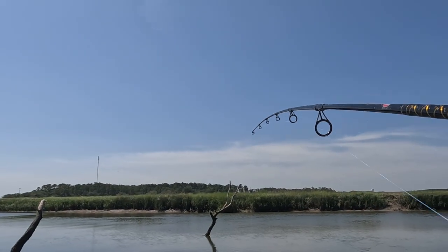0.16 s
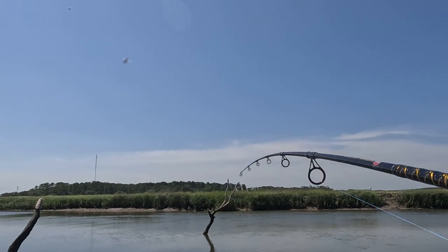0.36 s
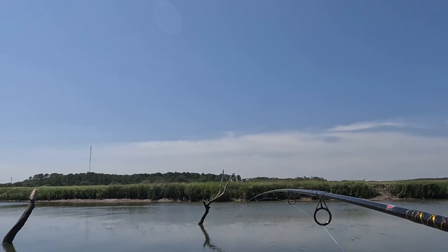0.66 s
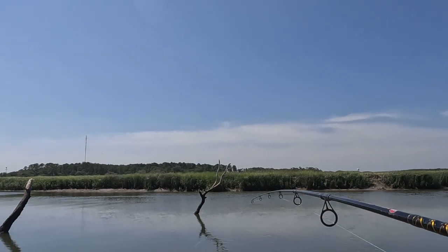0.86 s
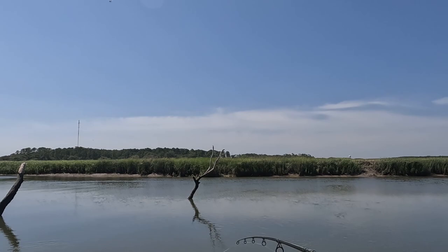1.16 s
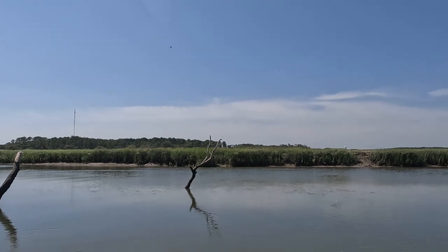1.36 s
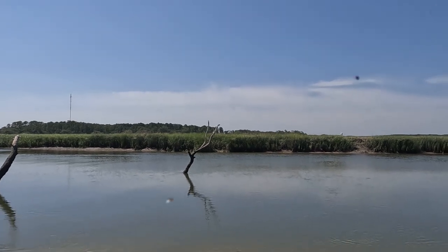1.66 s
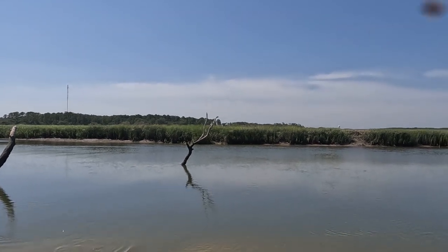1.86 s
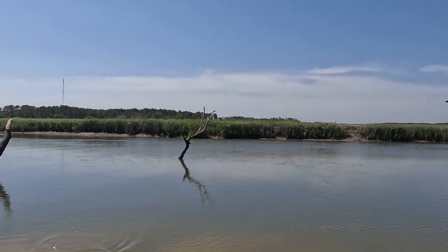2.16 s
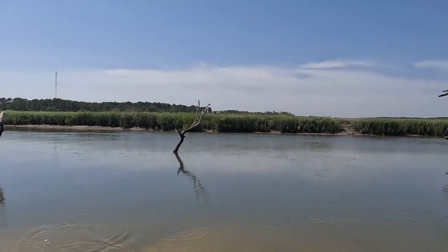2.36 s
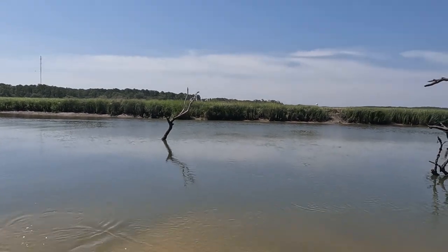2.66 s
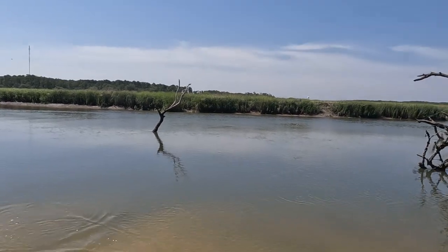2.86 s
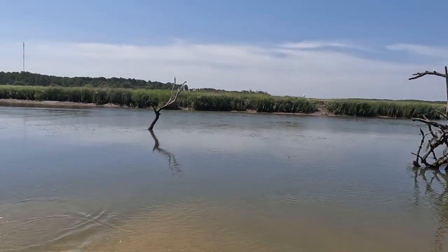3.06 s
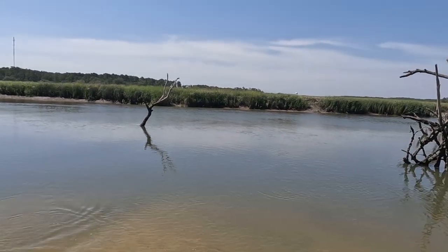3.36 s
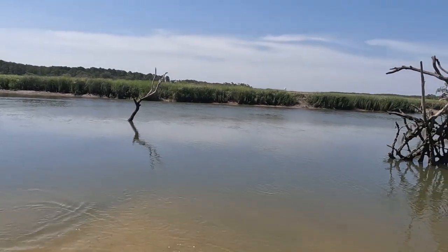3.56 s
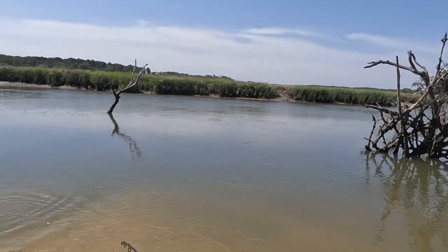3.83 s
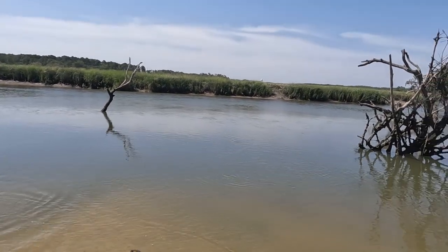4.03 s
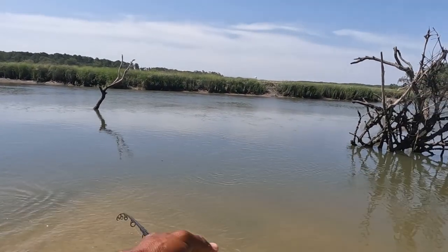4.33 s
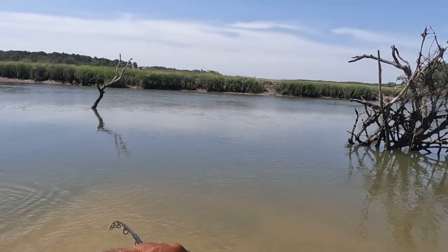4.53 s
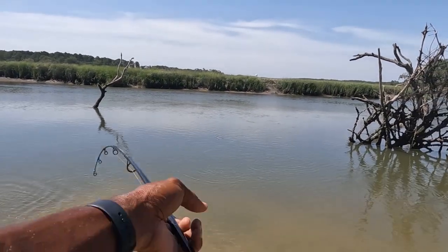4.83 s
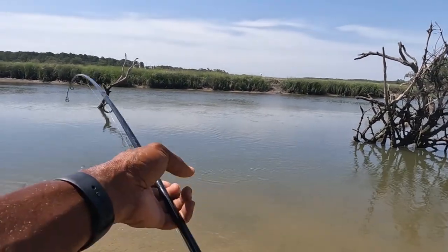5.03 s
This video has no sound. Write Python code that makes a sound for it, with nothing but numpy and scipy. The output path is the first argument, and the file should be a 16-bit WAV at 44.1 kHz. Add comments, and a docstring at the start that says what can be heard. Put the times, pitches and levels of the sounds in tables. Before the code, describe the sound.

A fishing reel is cranked in uneven whirring pushes with small clicks, then a fish thrashes and splashes in shallow water in light wind.

```python
"""A fishing reel cranked in uneven pushes: gear-mesh tones trace arches of pitch and contacts ring briefly.
Line hisses through the guides as grainy noise, with a rod rustle, a hoarse line note and grip scrapes.
In the shallows, swirling then thrashing, bubbles ring as decaying gliding tones, slaps as short modes,
and churn, splash and spray as clouds of droplet rings over noise. A low drone glides beneath.
Wind is low noise with gusts at two microphone ports, which differ in level and phase."""
import sys
import numpy as np
from scipy import signal
from scipy.fft import rfft, irfft, next_fast_len
from scipy.io import wavfile
from scipy.ndimage import uniform_filter1d

SR = 44100
rng = np.random.default_rng(int(sys.argv[2]) if len(sys.argv) > 2 else 0)


def master(y):
    """Save y as 16-bit WAV."""
    cut = np.clip(np.atleast_2d(y).T, -1, 1)
    pcm = np.round(cut * 32767)  # scale
    wavfile.write(sys.argv[1], SR, pcm.astype(np.int16))


N = 228967

# Spectrum of water noise and droplets. Each row: frequency in Hz, relative level in dB per Hz.
WATER_SPECTRUM = [(150, -31), (250, 35), (372, -7.5), (434, -7), (583, -7), (929, -6), (1010, -9),
                  (1330, -11), (1590, -12.5), (2060, -12.5), (2360, -21.5), (2660, -10.5), (3700, -19.5),
                  (6880, -20.5), (10000, -36.5), (12000, -33), (15500, -45)]


def from_db(db):
    """Amplitude ratio is ten to the power of decibels over twenty."""
    return 10 ** (np.asarray(db) / 20)


def rms_one(x):
    """Dividing by the root mean square normalizes a signal to unit power."""
    return x / np.sqrt(np.mean(x ** 2) + 1e-20)


def in_time(rows):
    """Linear interpolation reads each column of a time curve at every sample."""
    s, *columns = np.transpose(rows)
    return [np.interp(np.arange(N) / SR, s, c) for c in columns]


def during(rows, fade=0.17):
    """A trapezoidal gate is one while a curve lasts and fades linearly to zero outside it."""
    start, end = rows[0][0], rows[-1][0]
    return np.interp(np.arange(N) / SR, [start - fade, start, end, end + fade], [0, 1, 1, 0])


def at_hz(points, hz):
    """A spectrum is interpolated linearly over logarithmic frequency."""
    points = np.array(points)
    return np.interp(np.log(hz), np.log(points[:, 0]), points[:, 1])


def drift(rate):
    """Noise through a two-pole low-pass (bandwidth set by rate in Hz) wanders smoothly at unit rms."""
    r = np.exp(-40 * np.pi * rate / SR)  # computed at every 20th sample
    white = rng.standard_normal(N // 20 + 4002)
    slow = signal.lfilter([1], [1, -2 * r, r * r], white)[4000:]  # drop the filter's start-up
    return np.interp(np.arange(N) / 20, np.arange(len(slow)), rms_one(slow))


def band(x, low_hz, high_hz):
    """A Butterworth band-pass has a maximally flat passband."""
    edges = [low_hz, min(high_hz, SR / 2 - 1000)]
    return signal.sosfilt(signal.butter(2, edges, "band", fs=SR, output="sos"), x + 1e-18)


def resonate(x, hz, width_hz):
    """A damped pole pair forms one resonance, its pole radius set by bandwidth, with peak gain near 1."""
    r = np.exp(-np.pi * width_hz / SR)
    zeros = np.array([1, 0, -1]) * (1 - r * r) / 2
    return signal.lfilter(zeros, [1, -2 * r * np.cos(2 * np.pi * hz / SR), r * r], x + 1e-18)


def spread(mid, side, hz):
    """Mid and side sums of two signals set the interchannel coherence, lowest in the treble."""
    # Coherence of the two ports. Each row: frequency in Hz, likeness from 0 to 1.
    likeness = [(30, .9), (60, .85), (130, .99), (500, .97), (2000, .96), (4000, .92), (7500, .7),
                (13000, .4)]
    alike = np.clip(at_hz(likeness, hz), 0, .995)
    return np.sqrt(1 + alike) * mid + np.sqrt(1 - alike) * side * np.array([[1], [-1]])


def panned(x, left_db):
    """An interchannel level difference moves a source sideways."""
    return x * from_db(left_db * np.array([[.5], [-.5]]))


def add(out, s, sound):
    """Linear superposition mixes a short sound in at a time in seconds."""
    at = max(round(s * SR), 0)
    out[:, at:at + sound.shape[-1]] += sound[..., :max(N - at, 0)]


def noise(colour, low_hz, high_hz, patchy_db, count):
    """Subband synthesis: stereo noise bands flicker independently under a spectrum; total rms 1."""
    out, white = 0, rng.standard_normal((2, 2, N))
    edges = np.geomspace(low_hz, high_hz, count + 1)
    for k, (low, high) in enumerate(zip(edges, edges[1:])):
        hz = np.sqrt(low * high)
        gain = from_db(at_hz(colour, hz) + patchy_db * drift(25.5))
        out = out + gain * spread(*band(white[k % 2], low, high), hz)
    return rms_one(out)


def ringing_noise(x, hz, width_hz):
    """Two equal resonances in cascade sharpen a noise spectrum into a skirted peak; rms 1."""
    return rms_one(resonate(resonate(x, hz, width_hz), hz, width_hz))


def surges(rows, attack_s, release_s):
    """Envelopes rise, hold and decay exponentially, adding in power; one gain curve per level column."""
    power = 0
    for s, hold_s, *levels_db in rows:
        t = np.arange(N) / SR - s
        decay = np.exp(-np.clip((t - attack_s - hold_s) / release_s, 0, 20))
        shape = np.clip(t / attack_s, 0, 1) * decay
        power = power + np.outer(from_db(levels_db), shape) ** 2
    return np.sqrt(power)


def droplets(start_s, low_hz, high_hz, per_s, size_db, cycles, rise, count):
    """Small bubbles, as damped oscillators at random times, ring with rising pitch; rms 1 from start_s."""
    out, first = np.zeros((2, N)), int(start_s * SR)
    for hz in np.geomspace(low_hz, high_hz, count):
        drops = int(np.clip(per_s * (N - first) / SR / count, 1, 400))
        when, chance, pitch, side = rng.random((400, 4))[:drops].T
        size_level_db = size_db * np.minimum(-np.log(chance), 3)  # exponential spread, bounded
        size = from_db(size_level_db + at_hz(WATER_SPECTRUM, hz)) * hz
        step = np.arange(int(4 * cycles * SR / hz))
        turns = step * hz / SR
        detune = (high_hz / low_hz) ** ((pitch[:, None] - .5) / count)
        tones = np.sin(2 * np.pi * detune * turns * (1 + rise * turns / cycles))
        rings = tones * np.exp(-turns / cycles) * (1 - np.exp(-turns))
        at = (first + when * (N - first)).astype(int)[:, None] + step
        offset = size * np.sqrt(12) * (side - .5)  # uniform chance at unit variance
        for channel, gains in enumerate(spread(size, offset, hz)):
            out[channel] += np.bincount(at.ravel(), (gains[:, None] * rings).ravel(), N)[:N]
    return out / np.sqrt(np.mean(out[:, first:] ** 2))


def impacts(rows, ring_s, body_db, upper_db, upper_ratio, crack_db, crack_s, top_db, scatter_db, tail_s,
            attack_s):
    """Modal impact: two damped modes join a broad knock, a bright crack and a faint scattered tail."""
    out, t = np.zeros((2, N)), np.arange(SR // 16) / SR
    for s, peak_db, hz, treble_db in rows:
        decay = np.exp(-t / crack_s) + from_db(scatter_db) * np.exp(-t / tail_s)
        grit = rng.standard_normal((4, len(t))) * decay
        ring = np.sin(2 * np.pi * hz * t) * np.exp(-t / ring_s)
        upper_hz = min(upper_ratio * hz, 7500)
        upper = from_db(upper_db) * np.sin(2 * np.pi * upper_hz * t) * np.exp(-2 * t / ring_s)
        knock = from_db(body_db) * spread(*band(grit[:2], hz * 0.76, hz * 1.28), hz)
        top = spread(*band(grit[:2], 10800, 13000), 11000)
        crack = spread(*band(grit[2:], 3100, 6840), 4600) + from_db(top_db) * top
        hit = ring - upper + knock + from_db(crack_db + treble_db) * crack
        hit = hit * (1 - np.exp(-t / attack_s))
        # nominal peak: twice the rms of the loudest 2 ms
        crest = 2 * np.sqrt(uniform_filter1d(hit[0] ** 2 + hit[1] ** 2, SR // 500).max() / 2)
        add(out, s, from_db(peak_db) * hit / crest)
    return out


def arches(rows, swell):
    """Rotation that quickens and slows traces parabolic arches of pitch in Hz and strength."""
    slow_hz = 1045  # pitch at which an arch begins and dies away
    pitch, pushed = np.full(N, float(slow_hz)), np.zeros(N)
    for s, up_s, down_s, top_hz, whine_db in rows:
        t = np.arange(N) / SR - s
        effort = np.maximum(1 - (t / np.where(t < 0, up_s, down_s)) ** 2, 0)
        arch = slow_hz + (top_hz - slow_hz) * effort
        faster = arch > pitch  # the faster push takes over
        pushed[faster] = from_db(whine_db) * effort[faster] ** swell
        pitch[faster] = arch[faster]
    return uniform_filter1d([pitch, pushed], SR // 50)  # inertia rounds each change of speed


def whirr(pitch, rough, overtone_db):
    """Phase integrates a wavering pitch; modulation adds roughness and a throb per pinion turn."""
    teeth, throb_depth = 22, .32
    phase = 2 * np.pi * np.cumsum(pitch * (1 + .009 * drift(50))) / SR
    tone = (1 + rough * drift(70)) * np.sin(phase) + rough * drift(70) * np.cos(phase)
    tone = tone / np.sqrt(.5 + rough ** 2)
    throb = 1 + throb_depth * np.sin(phase / teeth + drift(30))
    throb = throb / np.sqrt(1 + throb_depth ** 2 / 2)
    return tone * throb * (1 + from_db(overtone_db) * 2 * np.cos(phase))  # product adds the octave


def air(level_db=-70.5):
    """Broadband noise of nearly steady band levels gives the faint hush of open air."""
    # Spectrum of the hush. Each row: frequency in Hz, relative level in dB per Hz.
    air_spectrum = [(180, -30), (300, -2), (562, -41), (849, -33), (1460, -2.5), (2210, -35), (7020, -15.5),
                    (9600, -33.5), (12100, -43), (15500, -101)]
    return from_db(level_db) * noise(air_spectrum, 356, 15900, patchy_db=1.0, count=9)


def wind(buffet_gain_db=-6.0, rumble_gain_db=1.5, rush_gain_db=1.5, lee_db=-3.0):
    """Turbulent pressure buffets the ports, the left in the lee, over low-frequency rumble and rush."""
    breeze_db = -30.5  # buffeting between gusts, ahead of its gain
    # Steadier wind. Each row: time in seconds, rumble and low rush in dB ahead of their gains.
    steady = [(0.0, -42, -51.5), (0.36, -51, -54), (1.14, -44.5, -49.5), (1.21, -48.5, -52.5),
              (1.76, -41.5, -49.5), (2.15, -55, -52.5), (3.18, -48.5, -53), (3.59, -48, -42.5),
              (3.8, -47.5, -49.5), (4.22, -53, -47.5), (4.35, -42.5, -53), (4.91, -54.5, -43),
              (5.19, -44, -44)]
    # Spectrum of wind noise. Each row: frequency in Hz, relative level in dB per Hz.
    wind_spectrum = [(8.8, -29), (15, 5.5), (26, -13), (59, -19.5), (102, -25), (174, -20.5), (402, -45.5),
                     (446, -53.5), (557, -78.5), (628, -37), (684, -46), (758, -43), (855, -46), (900, -43),
                     (1170, -73), (1980, -120)]
    # Gusts on the ports. Each row: start in seconds, hold in seconds, level in dB ahead of the gain.
    gust_rows = [(.17, 0.0094, -20.5), (.62, 0.13, -20.5), (.85, 0.065, -27.5), (1.36, 0.25, -26),
                 (1.51, 0.12, -20), (1.98, 0.017, -21), (2.2, 0.16, -20), (3.26, 0.099, -28),
                 (3.76, 0.044, -24), (4.29, 0.023, -19.5), (4.49, 0.022, -18.5), (5.04, 0.069, -19.5)]
    rumble_db, rush_db = in_time(steady)
    gusts, = surges(gust_rows, attack_s=0.0091, release_s=0.042)
    strength = from_db(buffet_gain_db) * np.hypot(from_db(breeze_db), gusts)
    buffet = strength * noise(wind_spectrum, 13.16, 49.3, patchy_db=2.0, count=4)
    low_pass = signal.butter(4, 40, fs=SR, output="sos")
    buffet = panned(signal.sosfilt(low_pass, buffet), lee_db)
    rumble = noise(wind_spectrum, 40.5, 119.3, patchy_db=1.5, count=3)
    rush = noise(wind_spectrum, 120.7, 415.7, patchy_db=2.0, count=8)
    return (buffet + from_db(rumble_db + rumble_gain_db) * rumble
            + from_db(rush_db + rush_gain_db) * rush)


def drone():
    """Integrating a gliding pitch gives a low tone; random quadrature modulation makes it waver."""
    # Hollow note as the fish turns. Each row: time in seconds, pitch in Hz, level in dB.
    drone_curve = [(3.2, 155.6, -51), (3.42, 160.4, -46), (3.5, 185.4, -48), (3.58, 173.2, -34),
                   (3.65, 176.3, -54), (3.72, 178.4, -39), (3.77, 134, -41.5), (3.81, 138.8, -58),
                   (3.86, 160.2, -37), (3.92, 186.2, -56), (4.04, 158.6, -44), (4.12, 170, -41.5),
                   (4.2, 177.6, -47.5), (4.35, 177, -62)]
    pitch, level_db = in_time(drone_curve)
    phase = 2 * np.pi * np.cumsum(pitch) / SR
    tone = (1 + .3 * drift(20)) * np.sin(phase) + .4 * drift(20) * np.cos(phase)
    return during(drone_curve) * from_db(level_db) * tone


def swirl(gain_db=0.5, small_db=-1.5):
    """Drops trickling around the turning fish ring as damped bubbles, the smaller ones higher."""
    # Drips flicked up. Each row: time in seconds, level in dB ahead of the gain.
    swirl_curve = [(3.12, -87), (3.22, -63), (3.33, -72), (3.45, -74.5), (3.68, -79), (3.82, -65),
                   (3.92, -63), (4.04, -70.5), (4.15, -72)]
    level_db, = in_time(swirl_curve)
    large = droplets(3, 1300, 4500, per_s=170, size_db=3.5, cycles=10, rise=.01, count=10)
    small = droplets(3, 4800, 8000, per_s=110, size_db=4.0, cycles=14, rise=.006, count=6)
    return during(swirl_curve) * from_db(level_db + gain_db) * (large + from_db(small_db) * small)


def bubbles(attack_s=0.0026, glide_lengths=0.99):
    """A closing air pocket oscillates at its own pitch, gliding up or down as it decays."""
    # Air pockets. Each row: start in seconds, starting pitch in Hz, nominal peak in dB,
    # length in seconds, glide in octaves per length (negative falls).
    pockets = [(0.191, 240, -30.5, 0.014, -0.1), (1.151, 605, -43, 0.038, 0.16),
               (2.602, 550, -46.5, 0.017, 0.05), (2.626, 602, -52.5, 0.022, 0.13),
               (3.221, 1480, -40.5, 0.0093, 0.11), (3.223, 600, -44.5, 0.032, 0.59),
               (3.245, 877, -42.5, 0.025, 0.6), (3.298, 310, -43.5, 0.094, 0.19),
               (3.304, 397, -38, 0.0095, -0.79), (3.309, 1022, -44, 0.028, 0.058),
               (3.362, 623, -53, 0.031, 0.84), (3.355, 161, -32, 0.024, -0.1),
               (3.445, 677, -49.5, 0.029, 1.56), (3.409, 495, -52, 0.032, -0.01),
               (3.47, 189, -36, 0.12, 0.26), (3.522, 486, -57, 0.054, 0.74),
               (3.503, 333, -51, 0.089, -0.24), (3.55, 182, -27.5, 0.026, -0.17),
               (3.613, 253.4, -40.5, 0.062, 0.14), (3.831, 1640, -47.5, 0.016, -0.055),
               (3.89, 862, -47.5, 0.043, 0.19), (3.998, 998, -52, 0.033, 0.25),
               (4.212, 737, -31, 0.0093, 0.55), (4.212, 1176, -36, 0.011, 0.096),
               (4.277, 664, -30, 0.012, -0.27), (4.343, 430, -34, 0.015, 0.59),
               (4.382, 520, -36, 0.011, 0.7), (4.562, 464, -23.5, 0.015, 0.28),
               (4.586, 708, -26.5, 0.024, -0.08), (4.614, 462, -40, 0.054, -0.2),
               (4.63, 910, -35.5, 0.043, 0.011), (4.653, 402, -25.5, 0.019, -0.19),
               (4.697, 340, -24, 0.01, 0.063), (4.721, 575, -35.5, 0.031, 1.6),
               (4.773, 780, -27, 0.011, 0.22), (4.844, 366, -35, 0.017, -0.31),
               (4.849, 261, -25.5, 0.03, 0.19), (4.873, 1310, -33, 0.0041, -0.28),
               (4.875, 322, -31.5, 0.042, 1.1), (4.922, 758, -35.5, 0.0466, 0.97),
               (5.117, 905, -46, 0.065, 0.12), (5.178, 912, -36.5, 0.075, 0.066)]
    out, t = np.zeros((2, N)), np.arange(SR // 4) / SR
    for s, hz, peak_db, length, rise in pockets:
        pitch = hz * 2 ** (rise * np.minimum(t / length, glide_lengths))
        phase = 2 * np.pi * np.cumsum(pitch) / SR
        wobble = 1 + .3 * rms_one(band(rng.standard_normal(len(t)), 15, 90))
        shape = (1 - np.exp(-t / attack_s)) * np.exp(-(t / length) ** 2 * 1.83)
        add(out, s, from_db(peak_db) * shape * wobble * np.sin(phase))
    return out


def patter(grain_db=6.5):
    """Random modulation of a narrow treble band gives the thin sizzle of fine spray landing close by."""
    # Spray falling. Each row: start in seconds, hold in seconds, level in dB ahead of the grain.
    patter_rows = [(3.2, 0.012, -88), (3.29, 0.0076, -62.5), (3.41, 0.0069, -70), (3.92, 0.048, -69),
                   (4.56, 0.034, -69), (5.018, 0.017, -53.5), (5.1, 0.1, -72)]
    falling, = surges(patter_rows, attack_s=0.0034, release_s=0.0083)
    sizzle = rms_one(spread(*band(rng.standard_normal((2, N)), 10800, 12100), 11000))
    return from_db(grain_db * drift(220)) * falling * sizzle


def slaps():
    """Water struck by slaps and drops responds as brief damped modes with a noisy crack."""
    # Slaps and drops. Each row: start in seconds, nominal peak in dB, ring in Hz,
    # relative treble weight in dB.
    slap_rows = [(3.1776, -46, 2030, -7), (3.2104, -36, 4170, -3), (3.2135, -35, 7120, -2),
                 (3.2699, -46, 6360, -20), (3.2883, -41, 1180, -7), (3.3027, -41.5, 1340, 1),
                 (3.3348, -52, 7100, -25), (3.414, -45.5, 1850, -10), (3.4355, -53, 3130, -30),
                 (3.5722, -39.5, 5200, -12), (3.606, -44, 3280, -28), (3.6563, -46, 1990, -9),
                 (3.9133, -40, 1300, -5), (3.9327, -41.5, 3520, -9), (3.959, -39.5, 5400, -7),
                 (3.979, -41, 1430, -19), (3.997, -43, 7400, -20), (4.1172, -38, 5340, -5),
                 (4.1255, -36.5, 4940, 11), (4.1713, -30, 1720, -48), (4.238, -29, 3110, -8),
                 (4.275, -29, 1630, -20), (4.2995, -38, 6630, -17), (4.3688, -25.5, 930, -25),
                 (4.3692, -11.5, 2700, -41), (4.3715, -22.5, 1400, -23), (4.3782, -27, 2400, -18),
                 (4.3862, -29, 3450, -11), (4.4032, -28.5, 1330, -19), (4.4417, -37, 5600, -11),
                 (4.4548, -29, 2670, -12), (4.4732, -27.5, 1820, -7), (4.4996, -34, 1980, -13),
                 (4.5988, -17.5, 4570, -21), (4.6003, -17.5, 990, -2), (4.6655, -31, 2950, 9),
                 (4.704, -34, 2300, 0), (4.7634, -30, 5100, -18), (4.7968, -32, 5620, -15),
                 (4.8395, -29.5, 1680, -9), (4.862, -38, 5700, -20), (4.8782, -15.5, 1350, -20),
                 (4.8995, -29.5, 6860, -22), (4.9192, -36, 6730, -16), (4.945, -35, 4840, -24),
                 (4.9879, -40, 1350, -14), (5.0079, -30, 1660, -2), (5.028, -26.5, 1320, -24),
                 (5.0505, -31, 3250, 0), (5.0625, -27.5, 1990, -27), (5.1152, -40, 6700, -11),
                 (5.1416, -32.5, 2000, -24), (5.1546, -36.5, 5000, 1)]
    return impacts(slap_rows, ring_s=0.0018, body_db=-5.0, upper_db=-28.0, upper_ratio=1.97, crack_db=3.5,
                   crack_s=0.0012, top_db=-20, scatter_db=-15.5, tail_s=0.014, attack_s=0.000086)


def thrashing(churn_gain_db=-5.5, splash_gain_db=-1.0, spray_gain_db=-3.0, foam_db=-3.0, wash_db=-4.0,
              clump_db=2.0):
    """Bubble pitch falls with size: big ones churn, small ones splash and fine ones spray over foam."""
    # Tail beats. Each row: start in seconds, hold in seconds, churn, splash and spray in dB ahead of gains.
    tail_beats = [(3.88, 0.026, -66, -60.5, -60.5), (3.95, 0.098, -77, -70, -68.5),
                  (4.185, 0.022, -56, -57, -60), (4.213, 0.12, -42, -48.5, -58),
                  (4.36, 0.0053, -38.5, -44, -44), (4.49, 0.04, -49, -54, -62),
                  (4.53, 0.06, -44.5, -46, -48.5), (4.555, 0.056, -32.5, -47, -65),
                  (4.64, 0.15, -38.5, -47.5, -53.5), (4.84, 0.049, -39.5, -45, -53),
                  (4.866, 0.018, -34.5, -40, -48), (4.92, 0.023, -45, -48, -74),
                  (5.018, 0.019, -38.5, -42, -40.5), (5.11, 0.085, -53, -55, -52.5)]
    # Stirred water between beats. Each row: time in seconds, splash and spray in dB ahead of clumping.
    slosh = [(4.21, -46.5, -55.5), (4.34, -52, -63), (4.42, -55.5, -62), (4.53, -50, -54),
             (4.78, -44.5, -57), (4.825, -65, -81), (4.9, -57, -54), (5.19, -57, -62)]
    churning, splashing, spraying = surges(tail_beats, attack_s=0.0026, release_s=0.032)
    sloshing, fizzing = during(slosh, fade=0.011) * from_db(in_time(slosh))
    big = droplets(3.8, 350, 1200, per_s=300, size_db=3.0, cycles=9, rise=.06, count=15)
    small = droplets(3.8, 1250, 4400, per_s=1500, size_db=3.9, cycles=8, rise=.012, count=26)
    fine = droplets(3.8, 4600, 15000, per_s=2000, size_db=4.8, cycles=9, rise=.004, count=28)
    churn = big + from_db(wash_db) * noise(WATER_SPECTRUM, 450, 1200, patchy_db=3.5, count=3)
    splash = small + from_db(foam_db) * noise(WATER_SPECTRUM, 950, 4340, patchy_db=1.5, count=4)
    spray = fine + from_db(foam_db) * noise(WATER_SPECTRUM, 4400, 15300, patchy_db=1.5, count=6)
    splash = np.hypot(from_db(splash_gain_db) * splashing, sloshing) * splash
    spray = np.hypot(from_db(spray_gain_db) * spraying, fizzing) * spray
    return from_db(churn_gain_db) * churning * churn + from_db(clump_db * drift(36.2)) * (splash + spray)


def grip(grip_hz=820, grip_width_hz=210, grit_db=-3.0):
    """Gritty friction noise excites the resonance of the rod butt at each scrape."""
    # Hand on the grip. Each row: start in seconds, hold in seconds, level in dB.
    scrapes = [(.33, 0.043, -67), (.675, 0.037, -54), (.885, 0.014, -58), (1.055, .012, -66),
               (2.56, 0.079, -66.5)]
    scraping, = surges(scrapes, attack_s=0.0036, release_s=0.0093)
    slips = rng.standard_normal(N) * from_db(grit_db * drift(140))
    return scraping * ringing_noise(slips, grip_hz, grip_width_hz)


def singing_line(gain_db=-4.0):
    """Stick and slip over a guide is heard as a hoarse tone: two random quadrature carriers."""
    # Note of the taut line. Each row: time in seconds, pitch in Hz, level in dB ahead of the gain.
    song = [(.28, 2880, -73), (.36, 2870, -58), (.46, 2680, -61), (.58, 2740, -64.5), (.645, 2330, -55),
            (.68, 2167, -85)]
    pitch, level_db = in_time(song)
    phase = 2 * np.pi * np.cumsum(pitch) / SR
    tone = drift(120) * np.sin(phase) + drift(120) * np.cos(phase)
    return during(song) * from_db(level_db + gain_db) * tone


def line(grain_db=2.0, guide_db=1.0, guide_hz=2750, guide_width_hz=600, ring_db=-19.0):
    """Sliding friction makes grainy noise, with a resonance of the guides and a rustle of the rod."""
    # Line running in. Each row: time in seconds, hiss and rod rustle in dB ahead of the grain.
    running = [(0.07, -83, -63), (0.14, -68, -62), (0.29, -65, -60), (0.52, -69, -60), (0.92, -66, -65),
               (1.23, -65.5, -55.5), (1.37, -67.5, -71), (1.68, -65, -59.5), (1.84, -70, -67),
               (2.3, -69, -69), (2.43, -76, -73), (2.52, -70.5, -71), (2.74, -71.5, -61.5),
               (2.98, -74, -76.5), (3.14, -67.5, -75.5), (3.37, -85, -64), (3.59, -79, -73.5),
               (3.8, -66.5, -66.5), (4.03, -77.5, -65), (4.15, -63, -67.5)]
    # Spectrum of the hiss. Each row: frequency in Hz, relative level in dB per Hz.
    line_spectrum = [(210, -41), (350, -18), (520, -12.5), (619, -19.5), (738, -17), (1210, -10),
                     (1460, -0.5), (2270, -14.5), (2800, -11.5), (3120, -21), (4160, -26.5), (7240, -28),
                     (9480, -47), (12000, -34), (15500, -88)]
    # Spectrum of the rod. Each row: frequency in Hz, relative level in dB per Hz.
    rod_spectrum = [(190, -33), (330, -3), (351, 10), (466, -2.5), (685, 0), (753, -25), (856, 4),
                    (1250, -1), (1620, -32), (2750, -120)]
    # Rod dips and faster line. Each row: start in seconds, hold in seconds,
    # rod rustle and line hiss in dB ahead of the grain.
    rustles = [(.27, .13, -63, -68.5), (.66, 0.076, -79, -69), (.88, 0.014, -59, -82),
               (.945, 0.076, -78, -63), (1.055, 0.016, -56.5, -72), (1.19, 0.02, -70, -72),
               (1.375, 0.045, -56, -63.5), (1.545, 0.11, -58.5, -62), (1.65, 0.15, -73, -68.5),
               (2.55, 0.068, -64.5, -67), (3.17, 0.16, -61.5, -67)]
    hiss_db, rod_db = in_time(running)
    shifts, slips = surges(rustles, attack_s=0.0033, release_s=0.0078)
    hiss = noise(line_spectrum, 2930, 12570, patchy_db=1.3, count=11)
    ring = ringing_noise(rng.standard_normal(N), guide_hz, guide_width_hz)
    guides = from_db(guide_db) * noise(line_spectrum, 1794, 2900, patchy_db=4.0, count=5)
    guides = guides + from_db(ring_db) * ring
    rod = np.hypot(from_db(rod_db), shifts) * noise(rod_spectrum, 365.7, 1282, patchy_db=2.5, count=7)
    sliding = np.hypot(from_db(hiss_db), slips) * (hiss + guides)
    return from_db(grain_db * drift(230)) * during(running, fade=0.068) * (sliding + rod)


def clicks():
    """Knocks and ticks of reel and rod excite short damped modes and a bright crack."""
    # Contacts. Each row: start in seconds, nominal peak in dB, ring in Hz, relative treble weight in dB.
    click_rows = [(0.0724, -39.5, 1540, -18.5), (0.1163, -47, 2006, -19), (0.1484, -40.5, 1390, -20),
                  (0.2754, -44, 1600, -5), (0.2905, -36, 2430, -36), (0.422, -36.5, 2000, -46),
                  (0.6572, -36, 2400, -21), (0.703, -42.5, 3560, -24), (0.7205, -50, 6300, -11),
                  (0.7838, -27.5, 1910, -41), (0.794, -43, 2580, -1), (0.8904, -38, 1900, -18),
                  (1.0854, -44, 2000, -11), (1.2251, -38, 2700, -21), (1.5508, -34.5, 2740, -31),
                  (1.5996, -24.5, 2300, -33), (2.0004, -42.5, 1998, -12), (2.011, -41, 7060, -6),
                  (2.0564, -29, 1936, -34), (2.1888, -34.5, 2738, -27), (2.235, -58, 3800, -8),
                  (2.3575, -28, 2091, -35), (2.4915, -41, 7070, -30), (2.509, -41.5, 1790, -31),
                  (2.5545, -37, 1870, -24), (2.563, -42, 2180, -22), (2.5685, -41, 4350, -27),
                  (2.5835, -42, 5250, -15), (2.6066, -47, 1860, -16), (2.8826, -42.5, 5710, -10),
                  (2.9092, -32.5, 2582, -13), (3.0175, -50, 2980, -35)]
    return impacts(click_rows, ring_s=0.0007, body_db=-2.0, upper_db=-9.0, upper_ratio=1.57, crack_db=11.0,
                   crack_s=0.001, top_db=-24, scatter_db=-21.5, tail_s=0.016, attack_s=0.0004)


def roller():
    """The line roller's rotation sets the pitch of its own rough whirr beside the gears."""
    # Roller spins. Each row: time of top speed, speeding up and slowing down in seconds,
    # top pitch in Hz, strength in dB, both ahead of inertia smoothing.
    rolls = [(.27, .13, 0.16, 1593, -64), (.41, 0.22, 0.11, 1445, -50.5), (.74, .07, .02, 1128, -58),
             (.84, 0.11, 0.093, 1506, -49), (.95, .09, 0.092, 1480, -53), (1.15, .1, .08, 1560, -63),
             (1.31, 0.1, .06, 1433, -57), (1.44, 0.094, 0.054, 1393, -60), (1.69, 0.2, 0.0805, 1474, -51),
             (1.87, .1, 0.15, 1920, -67), (2.04, .07, .05, 1946, -55), (2.19, 0.06, 0.07, 1836, -53.5),
             (2.99, 0.2, .15, 1548, -58)]
    pitch, spun = arches(rolls, swell=1.0)
    return spun * whirr(pitch, .5, overtone_db=-30)


def gears(housing_hz=1490, housing_width_hz=300, bite_db=-2.0, rub_db=-6.5, chatter_db=3.5,
          second_ratio=0.97):
    """Two gear meshes sing at tooth-contact pitch, cleanest near the housing resonance that rubbing rings."""
    # Pushes on the crank. Each row: time of top speed, speeding up and slowing down in seconds,
    # top pitch in Hz, whine in dB, both ahead of inertia smoothing.
    pushes = [(.21, 0.069, 0.054, 1854, -57.5), (.34, .12, 0.19, 1947, -56.5), (.59, 0.18, 0.16, 1530, -60),
              (.91, 0.21, 0.13, 1634, -56), (1.17, 0.049, 0.088, 1850, -54),
              (1.26, 0.098, 0.099, 2184, -55), (1.336, .08, 0.088, 1710, -53.5),
              (1.496, 0.1, .1, 1555, -55), (1.66, 0.14, 0.094, 1592, -55), (1.97, 0.27, 0.15, 1975, -61.5),
              (2.04, .09, 0.16, 1592, -63), (2.208, .15, 0.13, 1640, -56),
              (2.285, 0.064, 0.069, 1797, -56.5), (2.42, .16, 0.33, 1534, -71),
              (2.65, .3, 0.4, 1525, -58.5), (3.01, 0.28, 0.16, 1607, -64)]
    # The fish pulls and the teeth bite. Each row: start in seconds, hold in seconds,
    # whine in dB ahead of the bite gain.
    bites = [(.3, 0.15, -63), (.625, 0.022, -49), (.78, 0.051, -41.5), (.93, 0.029, -41),
             (1.24, 0.028, -62), (1.725, 0.02, -49.5), (2.052, 0.021, -47.5), (2.315, 0.025, -42.5),
             (2.448, 0.012, -50), (2.867, 0.062, -41.5), (2.95, 0.062, -48.5), (3.16, 0.029, -55)]
    # Rotor rubbing under load. Each row: time in seconds, rub in dB ahead of the rub gain.
    rub_curve = [(.1, -58.5), (.27, -48.5), (.41, -43.5), (.6, -53), (.82, -42.5), (1.05, -51),
                 (1.32, -52.5), (1.62, -48.5), (1.9, -54.5), (2.1, -50.5), (2.6, -52), (2.95, -50),
                 (3.2, -55), (3.65, -85), (4.0, -60.5), (4.15, -56)]
    pitch, pushed = arches(pushes, swell=0.61)
    bitten, = surges(bites, attack_s=0.0041, release_s=0.019)
    load_db, = in_time(rub_curve)
    rough = .28 + .12 * np.minimum(np.abs(pitch - housing_hz) / 400, 1)
    mesh = np.hypot(pushed, from_db(bite_db) * bitten) * whirr(pitch, rough, overtone_db=-32)
    second = from_db(-9) * pushed * whirr(second_ratio * pitch, .6, overtone_db=-32)
    rub = ringing_noise(rng.standard_normal(N), housing_hz, housing_width_hz)
    rub_gain = from_db(load_db + rub_db + chatter_db * drift(52.4))
    return mesh + second + during(rub_curve) * rub_gain * rub


def scene():
    """Sources superpose: level differences set the reel slightly right and the water slightly left."""
    reel = gears() + roller() + grip() + line() + singing_line() + clicks()
    water = slaps() + bubbles() + swirl() + thrashing() + patter()
    return panned(reel, left_db=-1.0) + panned(water, left_db=1.0) + drone() + wind() + air()


def record(dry):
    """Two ports act as linear filters of differing level and phase; a steep low-pass cuts the top."""
    # Level of the ports. Each row: frequency in Hz, left minus right in dB.
    port_balance = [(25, -1.5), (60, -1), (130, 0), (250, -0.5), (500, 0.5), (1000, -0.5), (2000, -0.3),
                    (4000, -0.3), (8000, 2), (12000, 2)]
    # Phase of the ports. Each row: frequency in Hz, lead of the left in radians.
    port_phase = [(100, 0.41), (250, -0.25), (600, -0.65), (1400, -0.62), (2800, -0.76), (5000, -0.29),
                  (8000, -0.31), (14000, -0.8)]
    cutoff_hz = 15700
    size = next_fast_len(N + SR // 10)
    hz = np.maximum(np.fft.rfftfreq(size, 1 / SR), 1)
    half = np.array([[.5], [-.5]])
    ports = from_db(half * at_hz(port_balance, hz)) * np.exp(1j * half * at_hz(port_phase, hz))
    heard = irfft(rfft(dry, size) * ports, size)[:, :N]
    return signal.sosfilt(signal.ellip(10, .2, 80, cutoff_hz, fs=SR, output="sos"), heard)


dry = scene()
out = record(dry)
master(out)
```